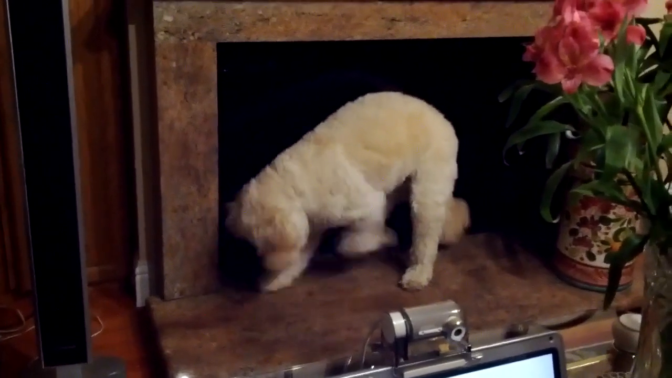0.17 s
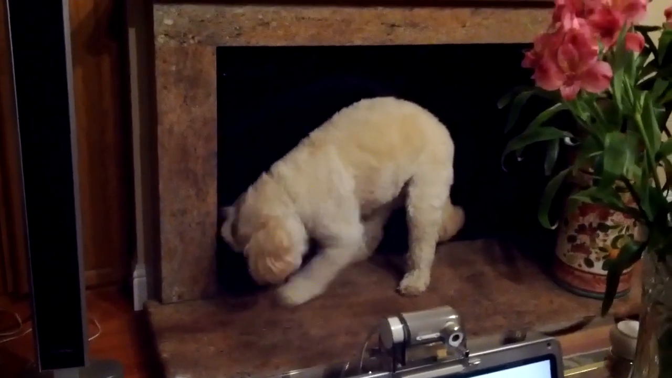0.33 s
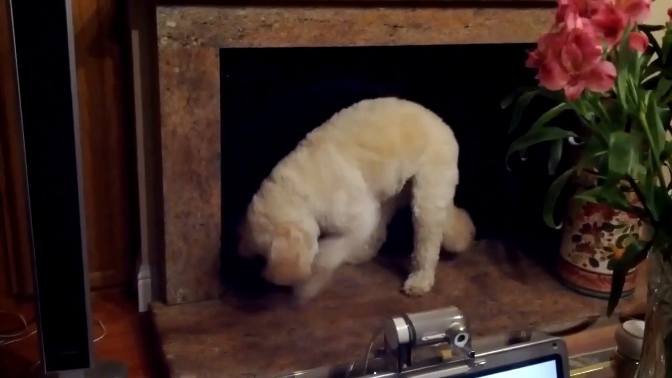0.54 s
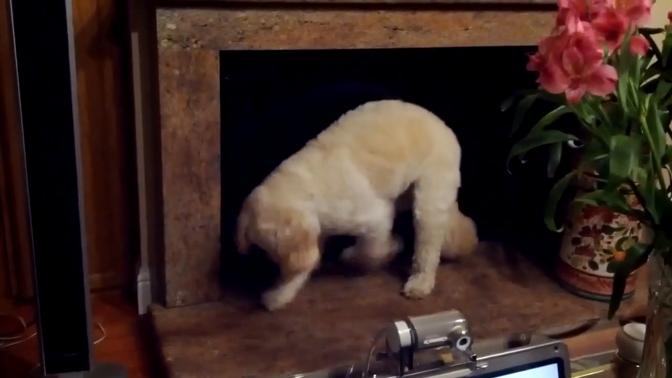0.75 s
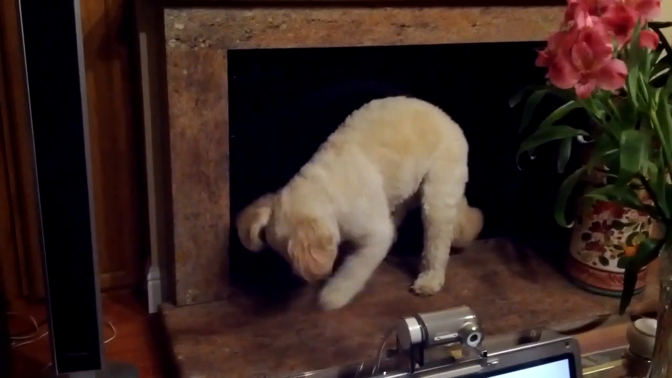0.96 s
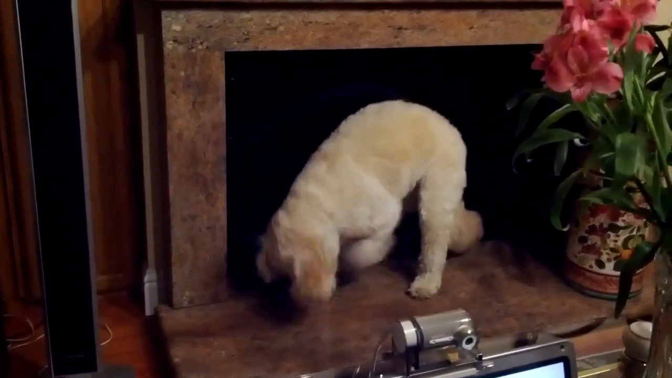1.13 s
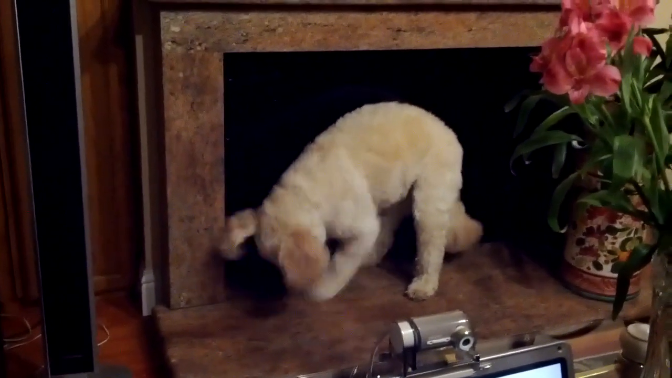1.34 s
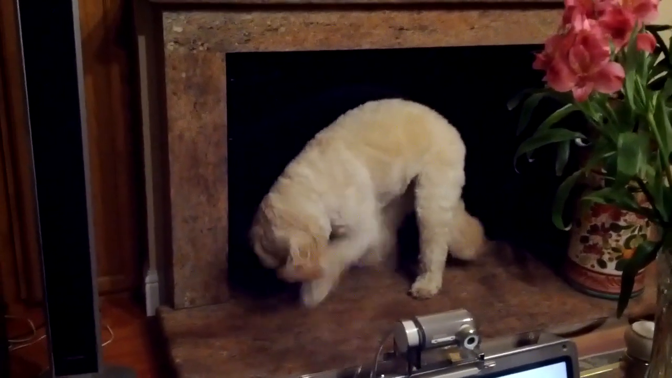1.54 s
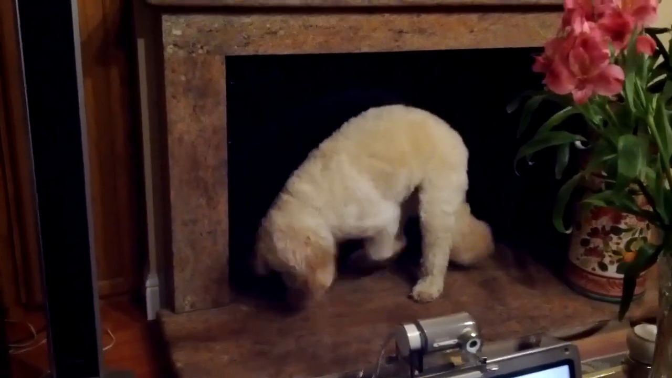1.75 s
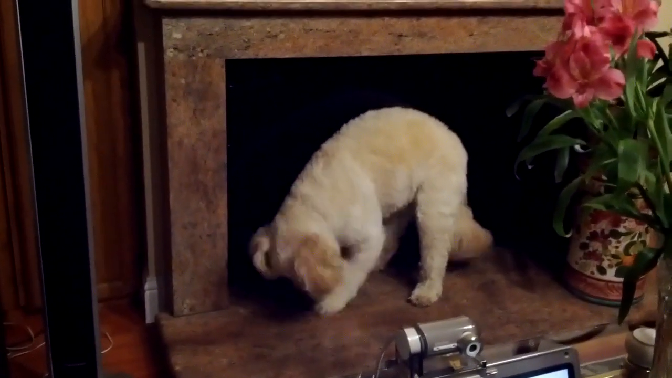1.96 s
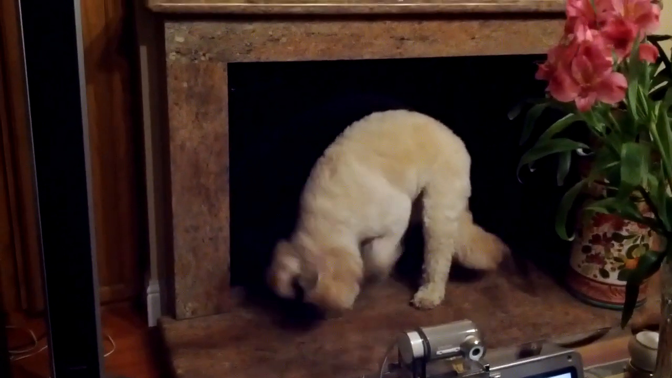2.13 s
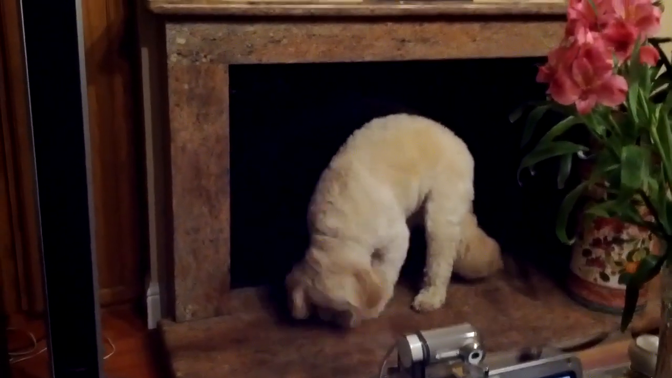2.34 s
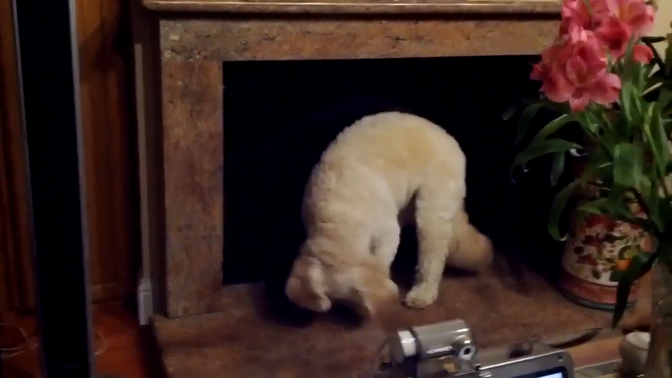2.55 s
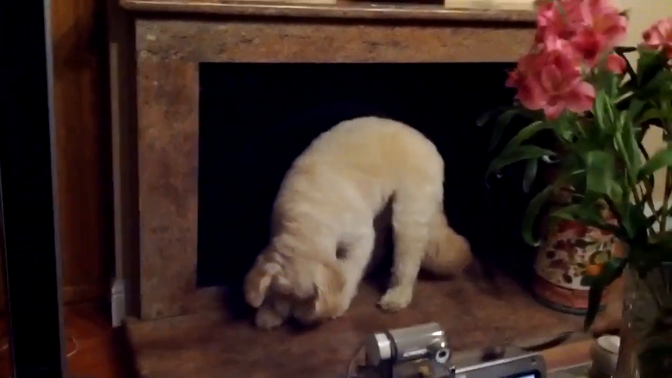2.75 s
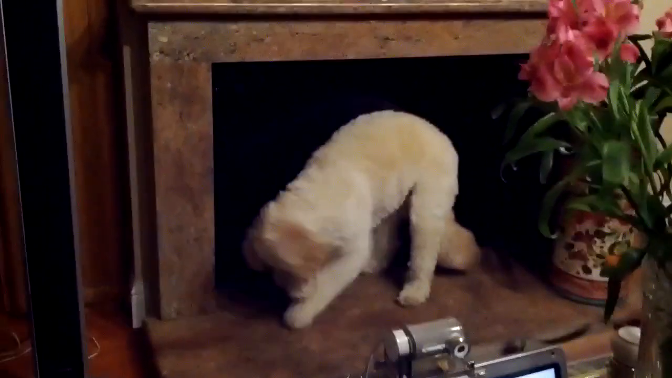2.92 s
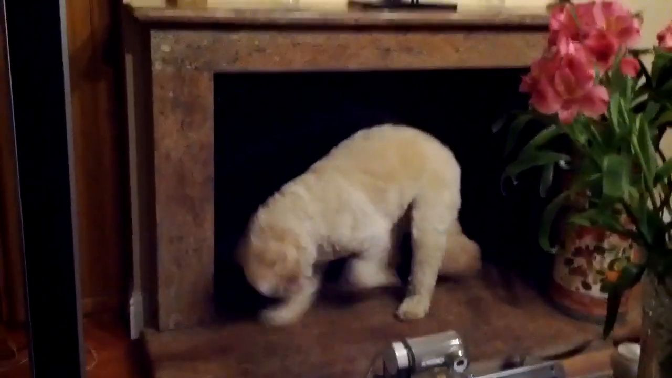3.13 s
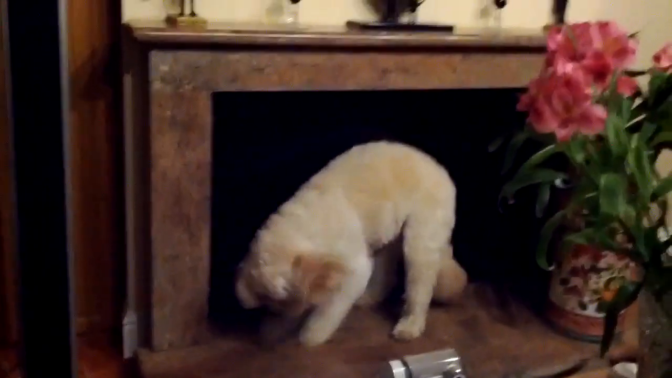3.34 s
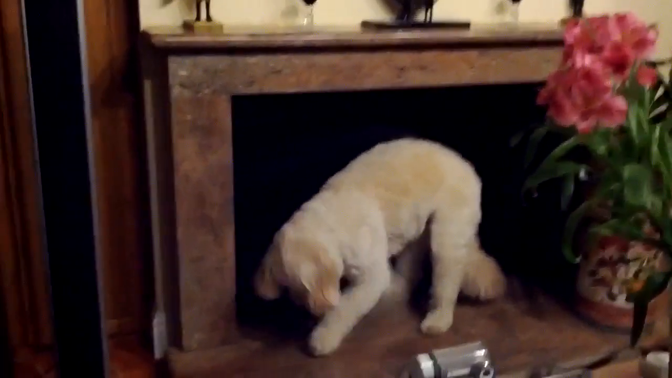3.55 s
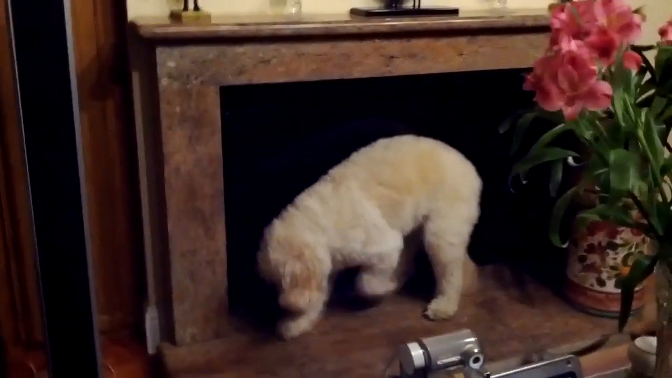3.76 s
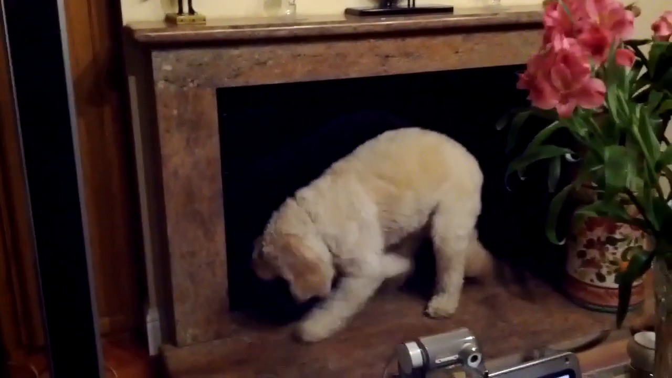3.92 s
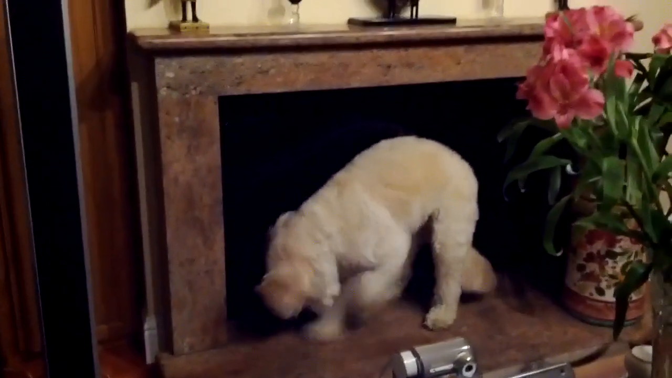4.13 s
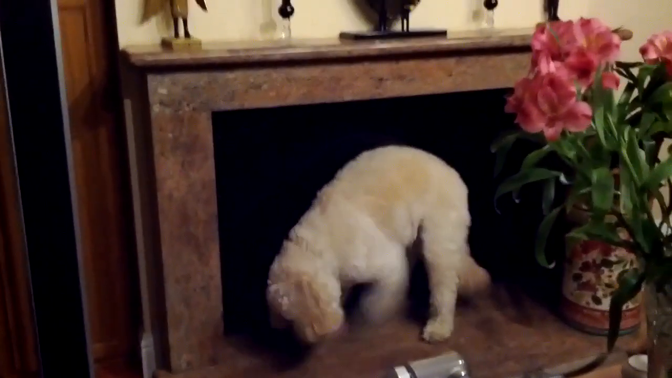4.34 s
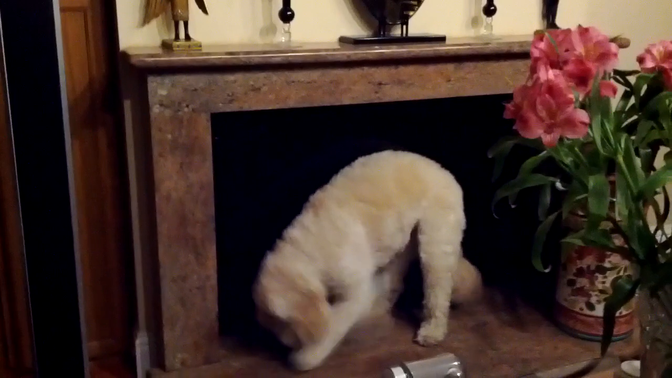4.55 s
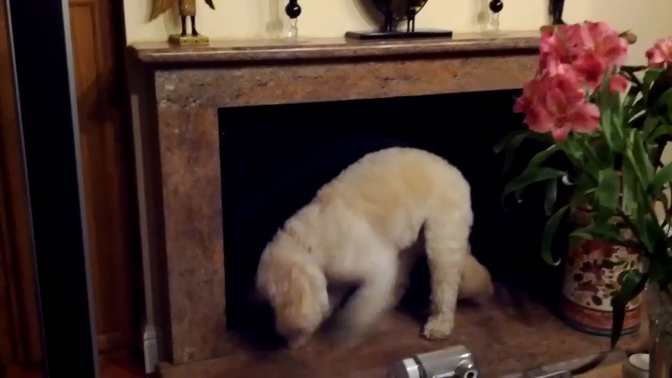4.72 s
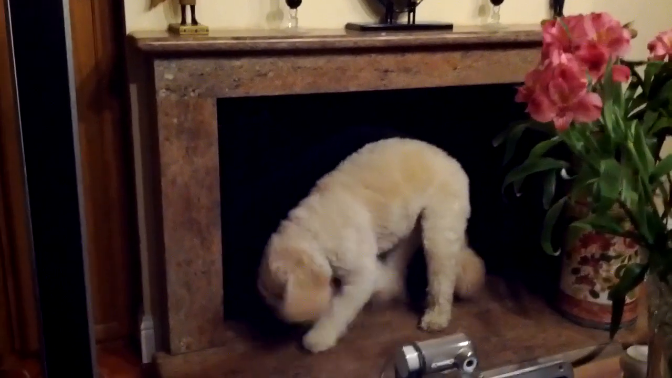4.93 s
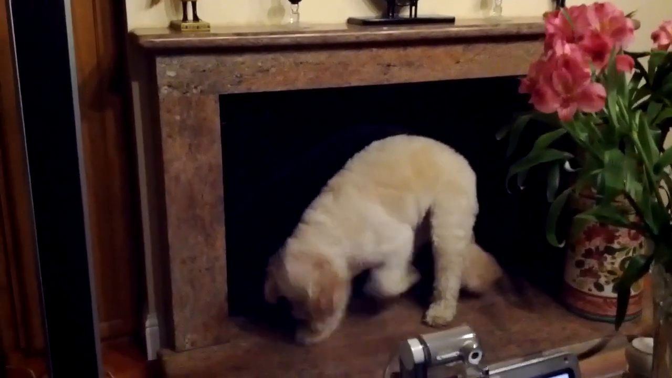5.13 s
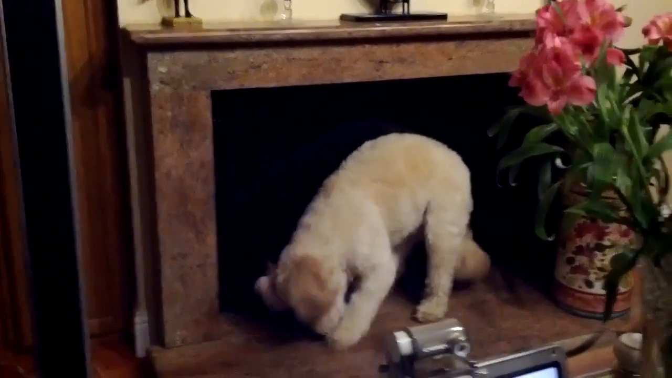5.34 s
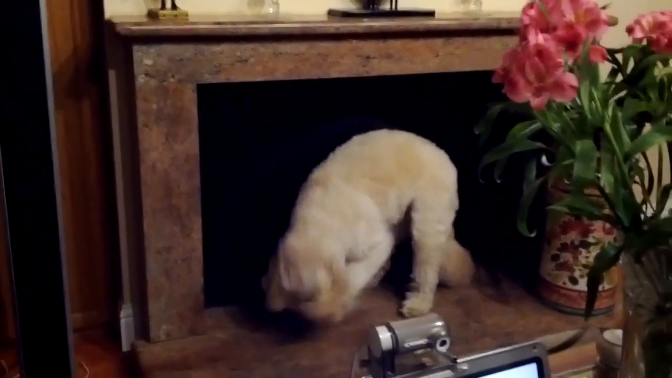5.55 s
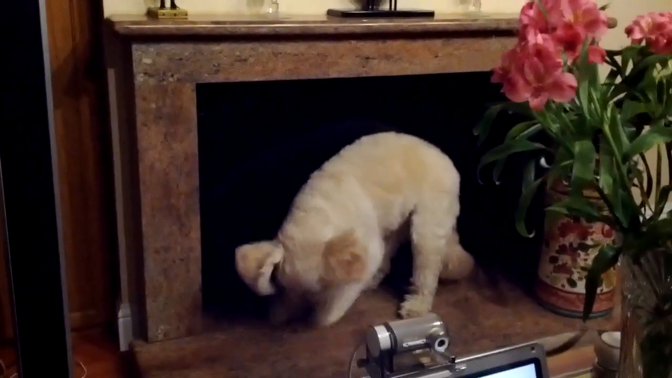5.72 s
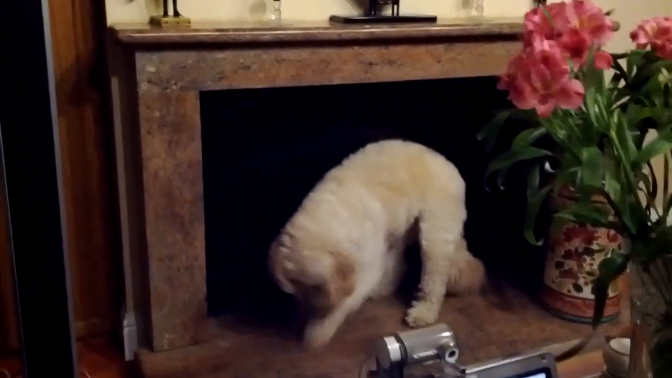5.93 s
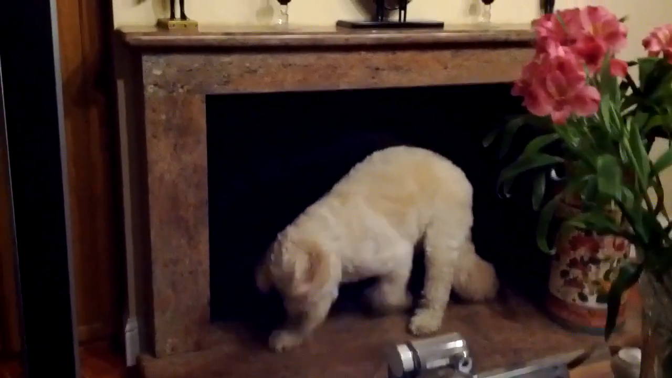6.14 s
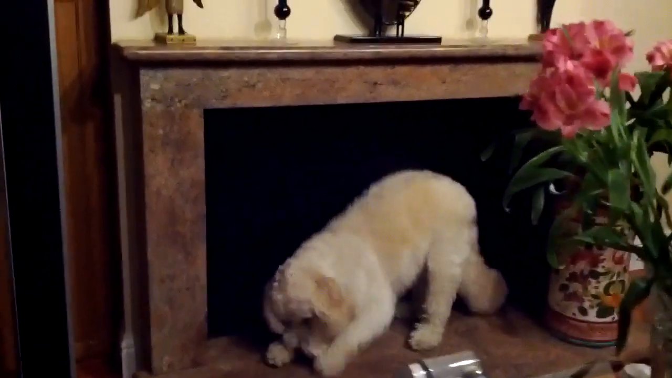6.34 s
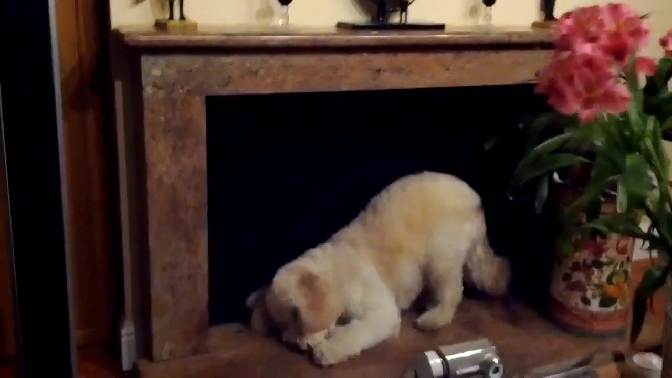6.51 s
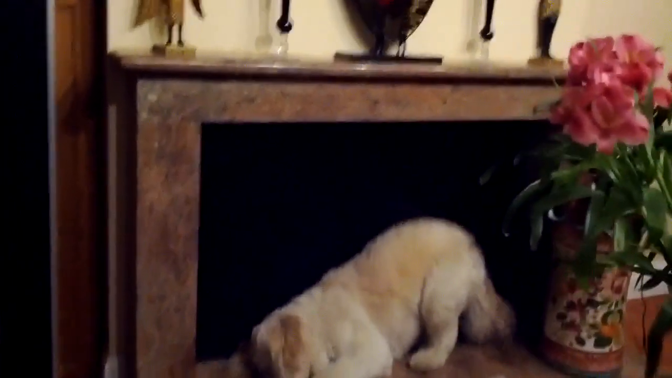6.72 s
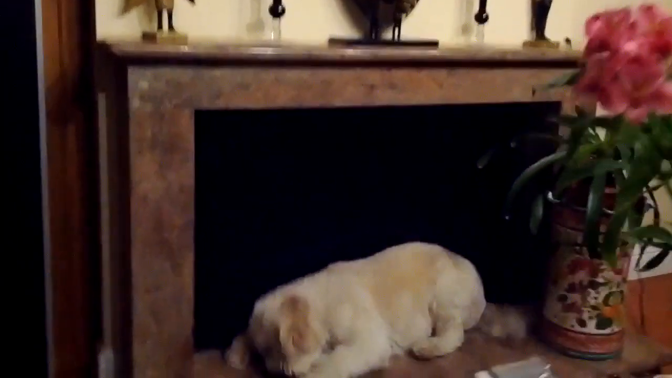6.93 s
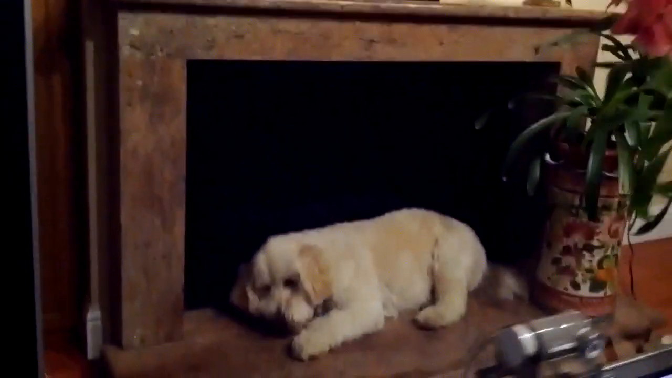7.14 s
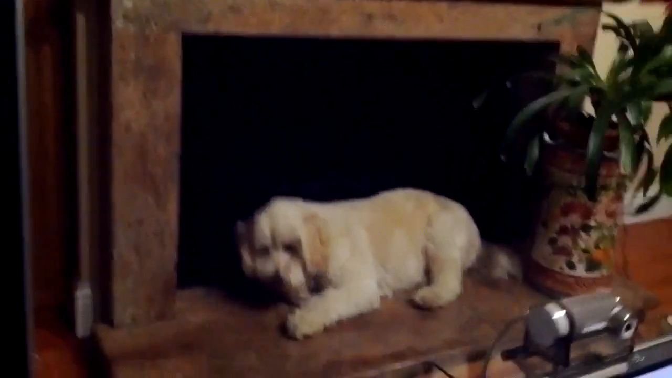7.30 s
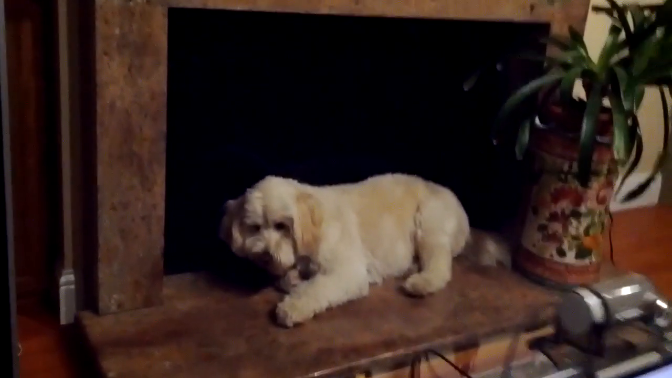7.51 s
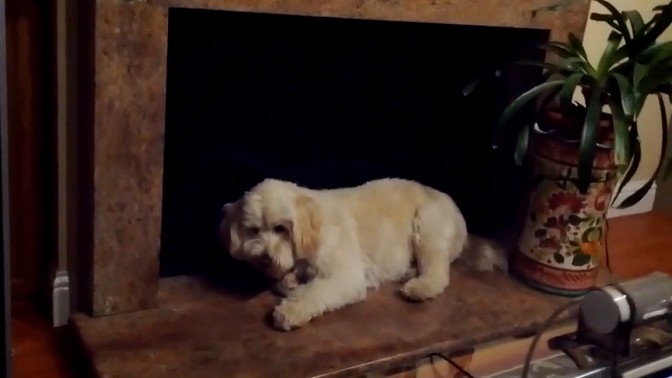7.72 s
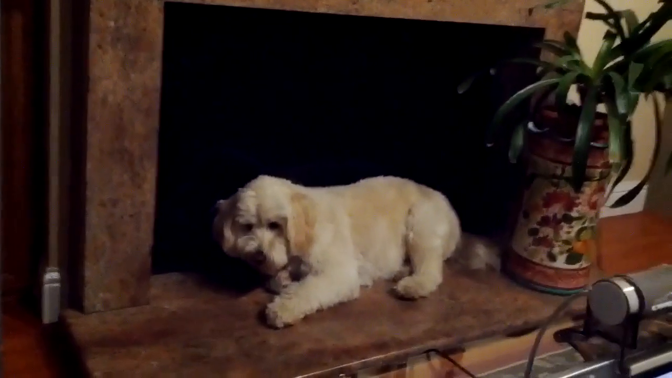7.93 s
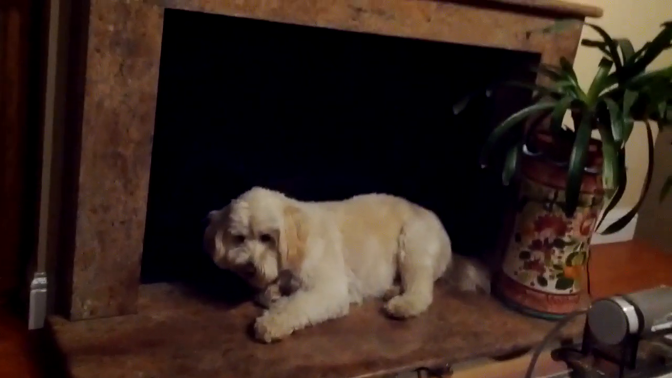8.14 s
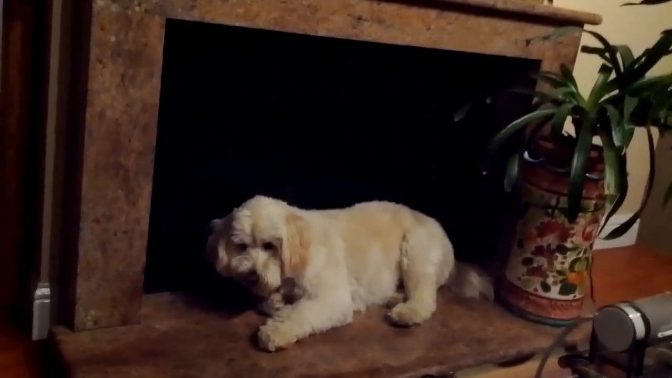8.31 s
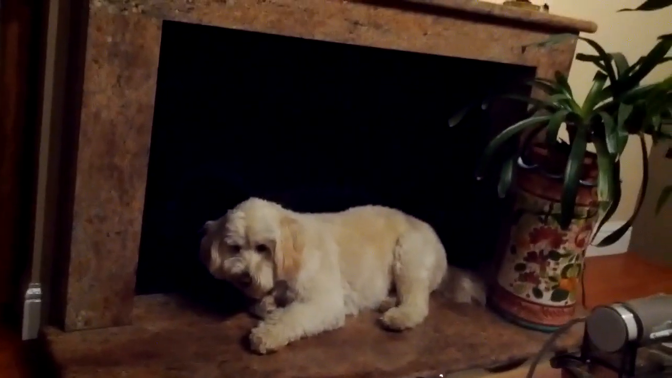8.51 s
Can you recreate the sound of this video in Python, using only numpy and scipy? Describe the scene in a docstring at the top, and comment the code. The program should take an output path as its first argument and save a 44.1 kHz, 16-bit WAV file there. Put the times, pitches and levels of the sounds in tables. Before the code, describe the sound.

Rapid dry claw scratching on a hard slab, heard close in a small lively room, with thin metal tag jingles between strokes. Bumps and sleeve rustle hit the microphone partway, and a thin electrical whine fades. Scratching continues more sparsely with pad slaps and one sharp clack, then body rub and low thumps as the dog lies down, and quiet background hiss.

```python
"""A living room with a stone hearth: a small dog digs at the slab, then lies down.
Claws click, skitter and rasp as random contacts through resonances; collar tags jingle as dying sine modes.
Paws and body scrape and thud, pads slap, and one hard double clack rings the stone.
A hand-held camera is knocked (contacts through resonances) and brushed by a sleeve (filtered noise).
Rumble, hiss and a hum lie underneath, with a thin electrical whine that falls away partway through."""
import sys
import numpy as np
from scipy import signal
from scipy.io import wavfile

SR = 44100
rng = np.random.default_rng(int(sys.argv[2]) if len(sys.argv) > 2 else 0)


def store_wav(level_fs):
    """Save 16-bit WAV to argv[1]."""
    pcm = np.round(np.clip(np.atleast_2d(level_fs), -1, 1) * 32767)
    wavfile.write(sys.argv[1], SR, pcm.T.astype(np.int16))


N = 377937
T = np.arange(N) / SR  # seconds

# Levels in the tables are relative: layers add their own trims in dB.
# scrapes over the stone, at first paw strokes, late ones mostly the body sliding as it lies down:
# middle_s, rasp_force_db, half_length_s, rub_db, ring_db, ring_pitch_hz
SCRAPES = [(0.028, -47.5, 0.091, -49, -52, 2050), (0.263, -50, 0.009, -63, -80.5, 2000),
           (0.437, -50, 0.01, -54.5, -69, 1980), (0.67, -46, 0.03, -49.5, -54.5, 2120),
           (0.846, -56.5, 0.16, -57, -59.5, 2060), (1.25, -63, 0.011, -59, -69, 2020),
           (1.393, -48.5, 0.02, -60, -63, 1600), (1.51, -45, 0.047, -57.5, -57.5, 2040),
           (1.656, -54.5, 0.08, -56, -59, 1660), (1.874, -53, 0.018, -54, -68, 1880),
           (2.262, -43, 0.029, -47.5, -48.5, 1530), (2.464, -49, 0.062, -71, -53.5, 2200),
           (3.887, -53, 0.031, -52.5, -64, 2000), (3.97, -48, 0.025, -54.5, -52, 2250),
           (4.138, -58, 0.1, -55, -64, 2020), (4.821, -50, 0.036, -53.5, -53, 2170),
           (4.9, -51.5, 0.041, -49.5, -62, 1580), (5.066, -53, 0.017, -62, -79, 1990),
           (5.26, -60, 0.041, -57.5, -74, 2000), (5.673, -50.5, 0.078, -48, -59, 2180),
           (5.994, -62.5, 0.11, -52, -77, 1900), (6.466, -62, 0.014, -47, -57, 1010),
           (6.505, -63, 0.0057, -49.5, -48, 940), (6.571, -69, 0.021, -55, -54.5, 950),
           (6.662, -77, 0.035, -66, -65, 1170), (6.828, -80, 0.0055, -68, -62, 2220),
           (6.946, -80, 0.0095, -73, -59, 1080)]
# colour of a claw click: frequency_hz, level_db
CLAW_COLOUR = [(300, -34), (2500, -10.5), (4500, -5.5), (7000, -2), (11000, -3.5), (13500, -6.5),
               (16000, -8.5)]
# ringing modes of the metal collar tags: frequency_hz, level_db, t60_s
TAG_RING_MODES = [(6590, -8, 0.06), (6640, -21, 0.09), (8400, -15, 0.018), (10450, -3, 0.022),
                  (10860, -2, .008), (11780, -1, 0.014), (12300, 1, .012), (12500, 1, 0.028),
                  (12640, 6, 0.046), (13200, -6, 0.012)]
# colour of tag edge meeting tag edge: frequency_hz, level_db
TAG_EDGE_COLOUR = [(500, -48), (4500, -28), (7000, -31.5), (10500, -2.5), (12500, -8), (14000, -4.5),
                   (16000, -12.5)]
STEADY_FROM_S = 8.5  # light claw taps and uneven rub pressure end here


def amp(db):
    """Turns decibels into a gain."""
    return 10 ** (np.asarray(db) / 20)


def unit(x):
    """Scales to energy 1."""
    return x / np.sqrt(np.sum(x ** 2) + 1e-20)


def evened(x):
    """Scales to rms 1."""
    return unit(x) * np.sqrt(len(x))


def read(points, hz):
    """Reads a spectrum on a log-frequency axis."""
    f, value = np.transpose(points)
    return np.interp(np.log(hz + 1), np.log(f + 1), value)


def over_time(points):
    """Draws straight lines between (second, value) points across the scene."""
    return np.interp(T, *np.transpose(points))


def add(mix, s, sound):
    """Mixes a sound in at second s."""
    part = mix[max(round(s * SR), 0):][:len(sound)]
    part += sound[:len(part)]


def response(points, size=2048):
    """Builds the causal, minimum-phase impulse response of a spectrum, at energy 1."""
    log_gain = np.log(amp(read(points, abs(np.fft.fftfreq(size, 1 / SR)))))
    spectrum = np.exp(np.conj(signal.hilbert(log_gain)))
    return unit(np.fft.ifft(spectrum).real[:size // 2])


def through(x, ring):
    """Lets x excite an impulse response."""
    return signal.fftconvolve(x, ring)[:len(x)]


def resonate(x, hz, width_hz):
    """One resonance of gain 1."""
    hz = min(hz, SR * .45)
    return signal.lfilter(*signal.iirpeak(hz, max(hz / width_hz, .5), SR), x)


def glide(x, hz, width_hz):
    """A steep resonance that follows the curve hz: shift down, smooth twice, shift back up."""
    turn = np.exp(2j * np.pi * np.cumsum(hz) / SR)
    r = np.exp(-np.pi * width_hz / SR)
    smoothed = signal.lfilter([(1 - r) ** 2], [1, -2 * r, r * r], x / turn)
    return 2 * (turn * smoothed).real


def wander(hz, count=N):
    """Random drift: straight lines between normal random values, hz new values per second."""
    knots = rng.standard_normal(count // 16)
    return np.interp(T[:count] * hz, np.arange(len(knots)), knots)


def contacts(t, per_s, size_db, t60):
    """One hard contact followed by dying random rebounds."""
    chance, size = rng.random(len(t)), rng.standard_normal(len(t))
    train = (chance < per_s / SR) * size * amp(size_db - 60 * t / t60)
    train[0] = 1
    return train


def grit(per_s, spread_db):
    """Many random catches of uneven size, rms 1."""
    size = amp(spread_db * np.minimum(rng.exponential(1, N), 4))
    return evened((rng.random(N) < per_s / SR) * rng.standard_normal(N) * size)


def hand_rumble():
    """The hand on the camera: low filtered noise that follows the grip."""
    # rumble over time: time_s, level_db
    grip = [(0, -56), (2.5, -55), (3.3, -48.5), (3.6, -45.5), (3.8, -53), (7, -56), (7.9, -63), (8.57, -60)]
    # colour of the rumble: frequency_hz, level_db
    rumble_colour = [(15, -8), (45, 4.5), (80, 0), (130, -10.5), (220, -7), (350, -19), (800, -47.5),
                     (3000, -74)]
    return through(rng.standard_normal(N), response(rumble_colour, size=8192)) * amp(over_time(grip))


def microphone_hiss():
    """Steady noise of the microphone."""
    # colour of the hiss: frequency_hz, level_db
    hiss_colour = [(50, 1.5), (210, 17), (330, 6.5), (600, 3.5), (1200, -3.5), (3000, -4), (8000, -5.5),
                   (12000, 1.5), (15500, 1)]
    return amp(-60.5) * through(rng.standard_normal(N), response(hiss_colour))


def steady_hum():
    """Steady sine tones, each from a random phase."""
    # hum tones: frequency_hz, rms_level_db
    hum_tones = [(118.4, -64.5), (177.6, -67), (2589, -80.5)]
    return sum(amp(db) * np.sqrt(2) * np.sin(2 * np.pi * (hz * T + rng.random())) for hz, db in hum_tones)


def electrical_whine():
    """Thin sines on one slightly unsteady clock; the whine falls away, a faint whistle stays."""
    # whine tones: frequency_hz, level_db
    whine_tones = [(3878, -7.5), (7757, 4)]
    # whine over time: time_s, level_db
    whine_fall = [(0, -58), (3.58, -58), (3.72, -75), (8.57, -76)]
    clock = T + np.cumsum(0.00475 * wander(260)) / SR
    whine = sum(amp(db) * np.sin(2 * np.pi * hz * clock) for hz, db in whine_tones)
    whistle = amp(-72) * np.sin(2 * np.pi * 11640 * clock)
    return whistle + whine * amp(over_time(whine_fall))


def scrape_forces():
    """Forces of rasp and rub: the powers of continuous shuffling and each scrape's swell add up."""
    # fur and feet shuffling between the scrapes: time_s, rasp_db, rub_db
    shuffle = [(0.0, -55.5, -58.5), (1.15, -57, -59.5), (2.101, -56, -60), (2.6, -62, -55),
               (2.8, -56.5, -49.5), (3.9, -60, -62), (4.5, -65, -59.5), (5.4, -61, -61), (6.3, -68, -62.5),
               (6.75, -76, -59.5), (7.0, -68, -63.5), (7.3, -71, -61.5), (7.7, -89, -75)]
    s, rasp_db, rub_db = np.transpose(shuffle)
    power = np.array([amp(np.interp(T, s, db)) for db in (rasp_db, rub_db)]) ** 2
    for s, force_db, half_s, rub_db, _, _ in SCRAPES:
        near = abs(T - s) < .25
        swell = np.exp(-((T[near] - s) / half_s) ** 2)
        power[:, near] += amp([[force_db], [rub_db]]) ** 2 * swell
    return np.sqrt(power)


def claw_rasp(rasp_force):
    """Claws catch on countless grains; they stick and slip, so the rasp comes in clumps."""
    # colour of the rasp: frequency_hz, level_db
    rasp_colour = [(1500, -39), (3000, -10.5), (4000, 1), (5000, -1), (6600, 2), (8500, 5), (10500, 1),
                   (12500, -5), (14000, -5.5), (16000, -5.5)]
    flutter_db = 2 * wander(110)
    slip_db = 2 * wander(40)
    drag = grit(per_s=6000, spread_db=2.2) * rasp_force * amp(flutter_db + slip_db)
    return amp(2.5) * through(drag, response(rasp_colour))


def slab_ring():
    """The stone under each scrape rings in a few broad bands that climb, waver and swell."""
    # scraped-slab bands: multiple_of_ring_pitch, width_as_share_of_ring_pitch, level_db
    scrape_bands = [(.66, .26, -2.5), (1, .24, -0.5), (1.64, .3, -6.5)]
    glide_per_s, waver, waver_hz = 0.69, 0.093, 29.2  # glide and waver as shares of the ring pitch
    swell_db, swell_hz = 2.5, 45
    out, grains = np.zeros(N), grit(per_s=2000, spread_db=0.5)
    for s, _, half_s, _, ring_db, hz in SCRAPES:
        near = abs(T - s) < .25
        t = T[near] - s
        pitch = hz * (1 + glide_per_s * t + waver * wander(waver_hz, count=len(t)))
        ring = np.zeros(len(t))
        for ratio, width, db in scrape_bands:
            band = evened(glide(grains[near], pitch * ratio, hz * width))
            ring += amp(db + swell_db * wander(swell_hz, count=len(t))) * band
        out[near] += amp(ring_db) * np.exp(-.5 * (t / half_s) ** 2) * evened(ring)
    return out


def light_skitter(rasp_force):
    """Now and then a claw taps lightly and skitters: sparse catches trigger a dying burst."""
    taps = grit(per_s=12.3, spread_db=-5.0) * rasp_force * (T < STEADY_FROM_S)
    t = T[T < .1]
    burst = rng.standard_normal(len(t)) * amp(-60 * t / 0.044)  # t60 in seconds
    return amp(-3) * through(taps, unit(through(burst, response(CLAW_COLOUR))))


def shaken_tags(rasp_force):
    """The effort shakes the tags into light flurries: their edges tick and their long modes build up."""
    # how freely the tags shiver: time_s, level_db
    shiver_freedom = [(0, -8), (3.6, 5), (4.3, 19), (4.62, 27.5), (4.82, 12), (5.1, 20), (5.5, 17),
                      (5.68, 18), (6.0, 18.5), (6.5, 22.5), (6.8, 12)]
    flurry_db = 4.5 * np.minimum(wander(30), 1)
    touches = grit(per_s=900, spread_db=1) * rasp_force * amp(over_time(shiver_freedom) + flurry_db)
    shiver = sum(amp(db) * resonate(touches, hz, 5 / t60) for hz, db, t60 in TAG_RING_MODES if t60 > .025)
    rattle = amp(-14) * through(touches, response(TAG_EDGE_COLOUR))
    return shiver + rattle


def soft_rub(rub_force):
    """Pads and body rub the stone as fine noise, pressing unevenly."""
    # colour of the rub: frequency_hz, level_db
    rub_colour = [(100, 7), (300, 4), (600, 3.5), (1200, 2.5), (1600, -0.5), (2100, 0), (3000, -3.5),
                  (4500, -7.5), (7000, -11), (16000, -38)]
    friction = grit(per_s=2500, spread_db=1.5) * rub_force * amp(2 * wander(70))
    pressure_db = 4 * wander(21.755) * (T < STEADY_FROM_S)
    return amp(-3.0) * through(friction * amp(pressure_db), response(rub_colour))


def scraping():
    """Each scrape swells and fades as rasp, rub and slab ring, and the effort shakes the tags."""
    rasp_force, rub_force = scrape_forces()
    claw_sound = claw_rasp(rasp_force) + light_skitter(rasp_force)
    return claw_sound + slab_ring() + shaken_tags(rasp_force) + soft_rub(rub_force)


def claws():
    """Each claw snaps onto the stone and skitters; the nail rings briefly and the slab knocks."""
    # the loudest claw landings: start_s, level_db, click_pitch_hz, skitter_db (relative)
    landings = [(0.072, -40, 10100, -12), (0.1183, -30, 8100, -1), (0.1266, -24, 8800, -36),
                (0.2879, -24.5, 7700, -17), (0.394, -22.5, 9850, -7), (0.4241, -31, 8900, -12),
                (0.5936, -21.5, 9150, -13), (0.5976, -25.5, 7540, -6), (0.6756, -19.5, 10200, -24),
                (0.7066, -21.5, 11400, -3), (0.7437, -23, 9150, -6), (0.751, -26, 9500, -22),
                (0.759, -37, 8500, -29), (0.8493, -25, 12600, -7), (0.8813, -25, 9900, -14),
                (0.9211, -22.5, 6800, -18), (1.0676, -25, 7850, -6), (1.2453, -23.5, 7550, -16),
                (1.3425, -22, 11000, 6), (1.4918, -22.5, 12500, 1), (1.574, -26, 6600, 2),
                (1.6671, -31, 6700, -29), (1.7214, -26, 8200, 3), (1.8345, -33, 9500, -17),
                (1.8437, -29, 9500, -14), (1.9088, -30.5, 7900, -21), (2.0451, -27, 9100, -18),
                (1.956, -30, 7060, -6), (2.054, -30.5, 7450, -16), (2.2242, -21, 10000, 0),
                (2.286, -29, 8500, -9), (2.699, -19, 8040, -5), (2.9477, -18.5, 8900, -30),
                (3.038, -16, 11900, -21), (3.2492, -22.5, 8160, 3), (3.356, -14.5, 9200, -9),
                (3.3834, -23, 12200, -23), (3.472, -30, 9850, -7), (3.8298, -32, 12800, -14),
                (3.889, -29, 9050, -14), (4.1234, -32, 12000, -4), (4.2192, -23, 10400, -11),
                (4.2271, -29, 9500, -18), (4.5536, -31, 10800, -3), (4.855, -32, 12700, -19),
                (5.268, -21, 11500, -4), (5.4098, -29.5, 11800, 4), (5.763, -20, 11960, -7),
                (5.7708, -25.5, 11000, -19), (5.9607, -22.5, 11200, -12), (5.9725, -32, 11100, -21),
                (6.116, -23, 10700, -14), (6.1313, -34, 11500, -16), (6.2709, -30, 13200, -27),
                (6.3635, -26.5, 10100, -9)]
    # colour of the slab's knock: frequency_hz, level_db
    slab_colour = [(100, -14), (450, -5), (750, -18), (1150, -13), (1900, 23), (3300, 12), (5000, -14),
                   (9000, -41), (16000, -55)]
    nail_width_hz, slab_db = 3800, -24.5
    out, t = np.zeros(N), np.arange(3000) / SR
    click, slab = response(CLAW_COLOUR), response(slab_colour)
    for s, db, hz, skitter_db in landings:
        snap = contacts(t, per_s=9000, size_db=-4, t60=.007)
        slips = through(snap, contacts(t, per_s=650, size_db=skitter_db + 23.5, t60=0.049))
        nail = through(slips, click)
        nail = unit(unit(resonate(nail, hz, nail_width_hz)) + amp(-26.0) * unit(nail))
        knock = amp(slab_db) * unit(through(slips, slab))
        add(out, s, amp(db + 13.0) * (nail + knock))
    return out


def tags():
    """The tags chatter against each other; every strike shifts and rebalances their dying modes."""
    # the loudest tag strikes: start_s, top_level_db, low_ring_db
    tag_strikes = [(0.365, -34, -24.5), (0.398, -38, -30), (0.52, -34, -53), (0.6722, -41, -26.5),
                   (0.85, -41, -47), (1.0175, -33, -39), (1.045, -41, -50), (1.318, -26.5, -48),
                   (1.3275, -29, -47), (1.376, -29, -34), (1.589, -33.5, -24.5), (1.61, -52, -27),
                   (1.635, -33.5, -33), (1.6535, -40, -38), (1.666, -25.5, -22), (1.782, -28, -29.5),
                   (2.004, -30.5, -26), (2.1133, -40, -34.5), (2.4648, -35, -47), (2.813, -30.5, -40),
                   (3.0011, -47, -28.5), (3.0408, -17, -23.5), (3.294, -39, -29.5), (3.3177, -30, -49),
                   (3.333, -37, -46), (3.3543, -19.5, -33), (3.678, -12.5, -41), (4.002, -28, -60),
                   (4.116, -35, -62), (4.315, -16, -63), (4.3402, -11, -25), (4.3715, -24, -45),
                   (4.657, -27, -59), (4.671, -30, -51), (4.6857, -24, -20), (4.7025, -23, -50),
                   (4.7135, -24, -42), (4.732, -25, -41), (4.761, -32, -50), (4.855, -29, -55),
                   (4.8917, -29, -51), (4.9276, -33, -60), (4.9415, -35, -57), (5.02, -15.5, -31),
                   (5.0517, -29, -42), (5.069, -22.5, -40), (5.1825, -17, -39), (5.269, -26.5, -51),
                   (5.442, -32, -33.5), (5.454, -26, -38), (5.473, -27.5, -41), (5.5215, -31.5, -41),
                   (5.581, -36, -46), (5.6308, -28, -36), (5.708, -25.5, -28.5), (5.9035, -23.5, -38),
                   (6.048, -35, -37), (6.0636, -39, -38), (6.218, -28, -36.5), (6.2535, -38, -53),
                   (6.381, -30.5, -41), (6.4556, -24, -17), (6.466, -19, -24), (6.5172, -29, -30),
                   (6.5419, -32, -32)]
    out, t = np.zeros(N), np.arange(8000) / SR
    tick = response(TAG_EDGE_COLOUR)
    for s, top_db, low_db in tag_strikes:
        middle_db = top_db - 6
        chatter = contacts(t, per_s=650, size_db=-7.5, t60=0.03)
        balance = [(6700, low_db + 22.5), (8000, middle_db + 18.5),
                   (11400, middle_db + 14.0), (12200, top_db + 11.5)]  # (Hz, dB)
        for hz, db, t60 in TAG_RING_MODES:
            spread_hz = 25 + 130 * np.exp(-t60 / 0.025)  # damped modes shift most with the contact
            pitch = hz + spread_hz * rng.standard_normal()
            ring = amp(-60 * t / t60) * np.sin(2 * np.pi * (pitch * t + rng.random()))
            add(out, s, amp(db + read(balance, hz)) * unit(through(chatter, ring)))
        scuff = through(chatter, contacts(t, per_s=3800, size_db=-4.0, t60=0.055))
        add(out, s, amp(middle_db + 16.5) * unit(through(scuff, tick)))
    # the small tags radiate little below 4350 Hz
    return signal.sosfilt(signal.butter(N=2, Wn=4350, btype="highpass", fs=SR, output="sos"), out)


def knocks():
    """Dry knocks with a tick above, a hollow thump and a low bump below: contacts through resonances."""
    # dry knocks, the last three small taps as the dog settles:
    # start_s, level_db, pitch_hz, tick_db (relative), low_bump_db
    dry_knocks = [(2.236, 1.5, 1500, -8.5, -4), (2.392, 1, 1230, -19, -20), (2.7043, -11.5, 1570, -29, -15),
                  (2.811, -18.5, 690, -15, -15), (2.933, -13.5, 850, -4, -15),
                  (3.218, -32, 500, -20, -16.5), (3.23, -23.5, 650, -16, -24),
                  (3.284, -22.5, 600, -20, -11), (3.325, -22, 900, -8, -22),
                  (3.371, -11.5, 870, -20.5, -20), (3.423, -31, 600, -20, -22),
                  (3.462, -24, 600, -12, -11.5), (3.499, -21.5, 1100, 5, -29), (3.511, -40, 1000, 0, -30),
                  (3.5273, -27, 1800, 22, -27), (3.547, -20.5, 1500, 0, -47), (3.553, -20, 710, -9, -7.5),
                  (3.575, -22, 1400, 10, -25), (3.583, -9, 1800, 0, -14.5), (3.596, -25, 587, -13, -41),
                  (7.38, -36.5, 700, -18, -38), (7.458, -34, 1420, -15, -32), (7.48, -34, 1200, -3, -32)]
    # colour of the tick: frequency_hz, level_db
    tick_colour = [(100, 3.5), (450, 0.5), (1400, -1.5), (2000, 0), (2600, -4), (4000, 9), (9000, 8),
                   (16000, 3)]
    hollow_hz, hollow_width_hz = 345, 197
    hollow_db, hollow_growth = -6.5, 0.85  # growth in dB per dB of level, so soft knocks are less bright
    bump_hz, bump_t60_s = 133, 0.057
    out, t = np.zeros(N), np.arange(2000) / SR
    colour = response(tick_colour)
    dull = signal.butter(N=6, Wn=2200, fs=SR, output="sos")  # the woody body has little above this
    bump = unit(np.sin(2 * np.pi * bump_hz * t) * amp(-60 * t / bump_t60_s))
    for s, db, hz, tick_db, bump_db in dry_knocks:
        tap = through(contacts(t, per_s=4900, size_db=-13, t60=0.014), colour)
        body = signal.sosfilt(dull, resonate(tap, hz, hz * 0.7))
        thump = resonate(tap, hollow_hz, hollow_width_hz)
        woody = amp(db) * (unit(body) + amp(tick_db) * unit(tap))
        hollow = amp(hollow_db + hollow_growth * db) * unit(thump)
        add(out, s, woody + hollow + amp(bump_db) * bump)
    return out


def sleeve():
    """Cloth slides close to the microphone: each uneven swish rises, holds and fades as its hollows shift."""
    # brushes: start_s, hold_s, level_db, fade_db_per_s, hollow_ring_db (relative), treble_db (relative)
    brushes = [(2.832, 0.11, -38, 150, 8.5, 3.5), (3.051, 0.098, -48, 45, 14, -1.5),
               (3.525, 0.0033, -28.5, 1500, 2.5, -6), (3.629, 0.074, -36.5, 382, -7, -7.5)]
    # hollow resonances: frequency_hz, width_hz, level_db
    hollow_modes = [(1120, 650, -4), (2100, 650, -2.5), (5200, 1500, -6)]
    # colour of the swish: frequency_hz, level_db
    cloth_colour = [(150, 7.5), (350, 2), (600, 6.5), (1150, 1.5), (1600, 7.5), (2200, 2.5), (3100, 4),
                    (4000, 1), (5800, 0.5), (8000, 1), (12000, 2), (16000, -29)]
    # colour of the treble: frequency_hz, level_db
    fizz_colour = [(500, -26), (3300, -10), (4500, 6), (5600, 0), (6500, 6), (8000, 1), (12000, -0.5),
                   (16000, 1.5)]
    rise_db_per_s = 746
    shift, shift_hz, swell_db = .025, 45, 1.5  # shift as a share of each hollow's pitch
    t = np.arange(SR * 3 // 4) / SR - .1  # the rise comes before time 0
    out, count = np.zeros(N), len(t)
    cloth, fizz = response(cloth_colour), response(fizz_colour)
    for s, hold, db, fade, ring_db, treble_db in brushes:
        level_db = db - rise_db_per_s * np.maximum(-t, 0) - fade * np.maximum(t - hold, 0)
        fibres = rng.standard_normal(count) * amp(level_db + 2.2 * wander(130, count))
        hollow = np.zeros(count)
        for hz, width, mode_db in hollow_modes:
            swell = amp(mode_db + swell_db * wander(shift_hz, count))
            hollow += swell * glide(fibres, hz * (1 + shift * wander(shift_hz, count)), width)
        swish = through(fibres, cloth) / np.sqrt(1 + amp(ring_db))  # the hollows take over from the swish
        treble = through(rng.standard_normal(count) * amp(level_db), fizz)
        add(out, s + t[0], swish + amp(ring_db) * hollow + amp(treble_db) * treble)
    return out


def thuds():
    """Soft weight of paws and body on the hearth: a low, quickly damped push of sine and noise."""
    # landings: start_s, level_db, pitch_hz
    soft_landings = [(2.831, -35.5, 125), (2.885, -41, 169), (3.641, -40.5, 51), (3.687, -45, 102),
                     (3.927, -36, 125), (4.345, -43.5, 240), (4.692, -49, 147), (5.213, -43, 113),
                     (5.991, -40, 126), (6.408, -33.5, 131), (6.413, -53, 225), (6.452, -38.5, 134),
                     (7.254, -41, 39.3), (7.319, -50, 41.4)]
    out, t = np.zeros(N), np.arange(SR // 2) / SR
    for s, db, hz in soft_landings:
        width_hz = hz * 0.52
        fur = evened(resonate(resonate(rng.standard_normal(len(t)), hz, width_hz), hz, width_hz))
        push = np.sin(2 * np.pi * hz * t) + 1.6 * fur
        decay_db = -60 * t * hz / 18.3  # down 60 dB after 18.3 cycles
        add(out, s, amp(db - 2.0 + decay_db) * (1 - np.exp(-t / 0.0014)) * push)
    return out


def pats():
    """A soft pad slaps the slab: dense dying contacts through a dull colour."""
    # slaps: start_s, level_db
    pad_slaps = [(4.346, -17), (4.691, -17), (5.211, -27), (5.991, -21), (6.504, -38), (6.949, -30)]
    # colour of a slap: frequency_hz, level_db
    slap_colour = [(100, -14), (330, 5), (500, -6), (680, -12), (960, -0.5), (1300, -13.5), (2100, -16),
                   (5000, -18), (16000, -52)]
    out, t, slap = np.zeros(N), np.arange(3000) / SR, response(slap_colour)
    for s, db in pad_slaps:
        add(out, s, amp(db) * unit(through(contacts(t, per_s=1500, size_db=4, t60=0.11), slap)))
    return out


def clack():
    """A hard blow and its rebound ring the stone in dying sine modes from low to high."""
    # blow and rebound: start_s, level_db
    blows = [(5.8724, 11), (5.8766, 8)]
    # modes of the stone: frequency_hz, level_db, t60_s
    stone_modes = [(480, -13, 0.053), (654, -19, 0.041), (1174, -12.5, 0.02), (1520, -13, 0.022),
                   (2340, -14.5, 0.012), (3400, -8, 0.002), (4650, -7, 0.0037), (6870, -7.5, 0.004),
                   (9350, -8, 0.0066), (10500, 2, 0.0011), (11400, 1, 0.004), (13400, -7, .004)]
    out, t = np.zeros(N), np.arange(4000) / SR
    for s, level_db in blows:
        ring = np.zeros(len(t))
        for hz, db, t60 in stone_modes:
            tone = np.sin(2 * np.pi * (hz * t + rng.random()))
            ring += amp(db) * unit(amp(-60 * t / t60) * tone)
        add(out, s, amp(level_db - 6.5) * unit(ring))
    return out


def room(x):
    """Scattered reflections from fireplace and walls, each band dying at its own speed."""
    # reverberation: frequency_hz, t60_s
    room_decay = [(100, 0.53), (500, 0.18), (2000, 0.45), (6000, 0.35), (12000, 0.22), (16000, 0.26)]
    taps = rng.choice([-1., 1.], SR) * (rng.random(SR) < 4000 / SR) * (T[:SR] > .004)
    hz, t, z = signal.stft(taps, SR, nperseg=256)
    fading = z * amp(-60 * t / read(room_decay, hz)[:, None])
    tail = signal.istft(fading, SR, nperseg=256)[1]
    return through(x, unit(tail))


def dipped(x):
    """Now and then the midrange drops away for a moment."""
    # dips: middle_s, half_length_s of the deepest part (stretched slightly below)
    midrange_dips = [(0.361, 0.02), (1.062, 0.017), (3.023, 0.0023), (3.769, 0.0041), (4.304, 0.0055),
                     (5.828, 0.011), (6.876, 0.012)]
    low_hz, high_hz, depth = 430, 5760, 0.99
    band = signal.butter(N=4, Wn=[low_hz, high_hz], btype="bandpass", fs=SR, output="sos")
    middle = signal.sosfiltfilt(band, x)
    gap = sum(np.clip(2 - 2 * abs(T - s) / (half_s * 2.02), 0, 1) for s, half_s in midrange_dips)
    return x - depth * gap * middle


def scene():
    """Sums the sources, the room's answer to dog and knocks, the sleeve and the background."""
    background = hand_rumble() + microphone_hiss() + steady_hum() + electrical_whine()
    scrape, clicks, jingle, knock = scraping(), claws(), tags(), knocks()
    brush, thud, blow = sleeve(), thuds() + pats(), clack()
    to_room = amp(-10.0) * clicks + amp(-7.5) * blow + amp(-7.0) * jingle
    to_room += amp(-11.5) * scrape + amp(-8.5) * thud + amp(-25.0) * knock
    direct = clicks + blow + jingle + scrape + thud + knock
    mono = direct + room(to_room) + brush + background
    return np.tile(dipped(mono), (2, 1))


def record(dry):
    """One microphone on both channels, with a steep band limit at 15850 Hz."""
    band_limit = signal.firwin(401, 15850, window=("kaiser", 7), fs=SR)
    return signal.oaconvolve(dry, band_limit[None], "same")


dry = scene()
out = record(dry)
store_wav(out)
```